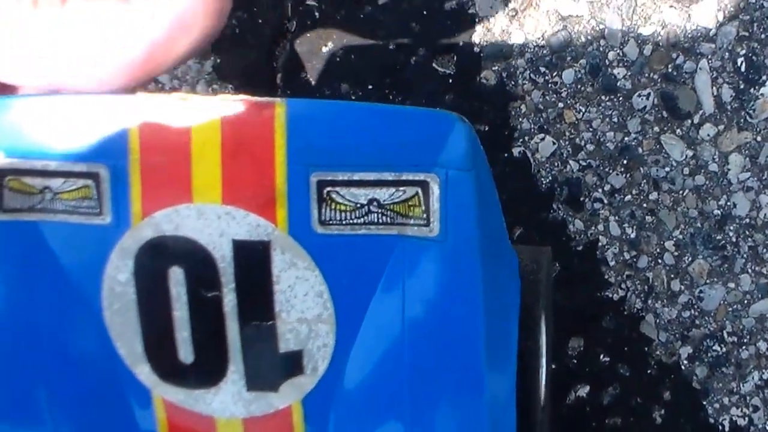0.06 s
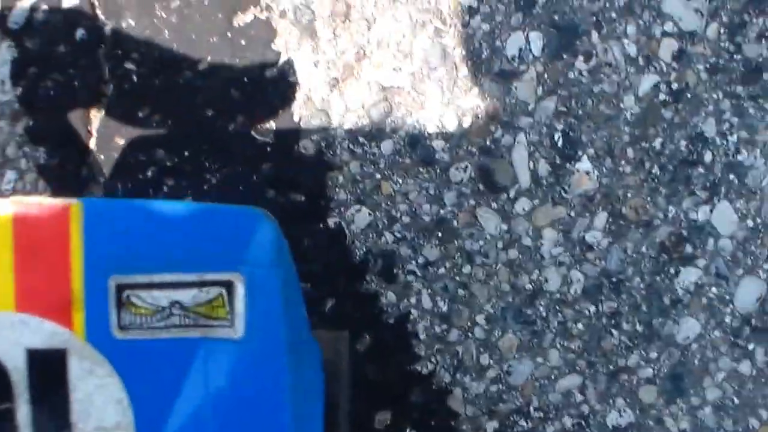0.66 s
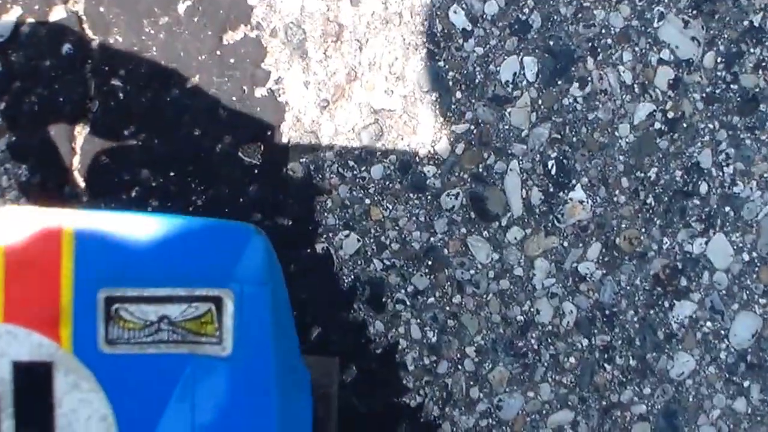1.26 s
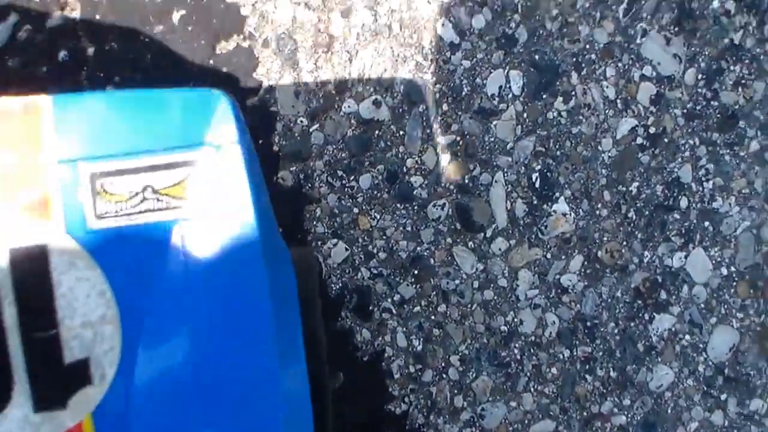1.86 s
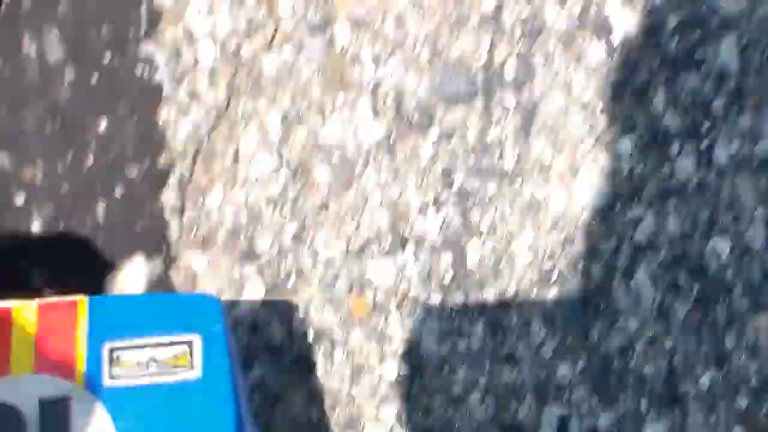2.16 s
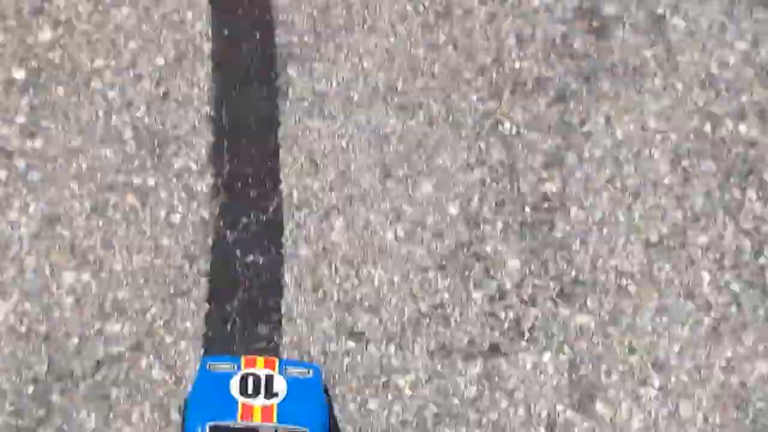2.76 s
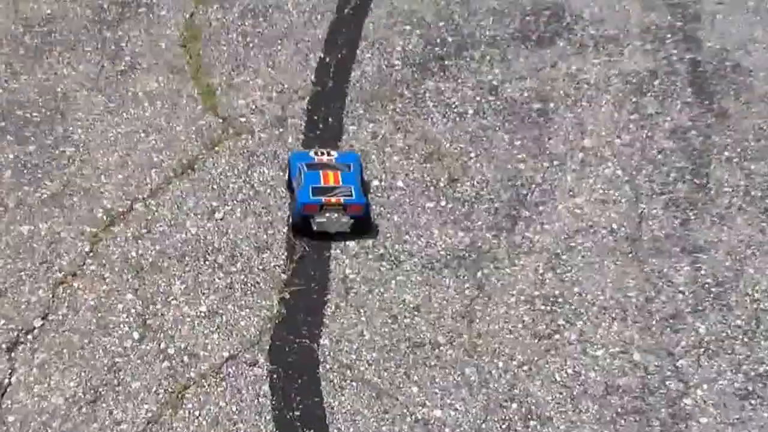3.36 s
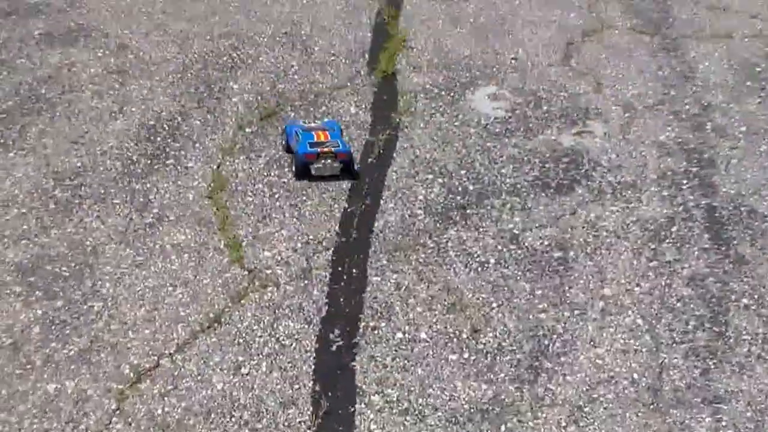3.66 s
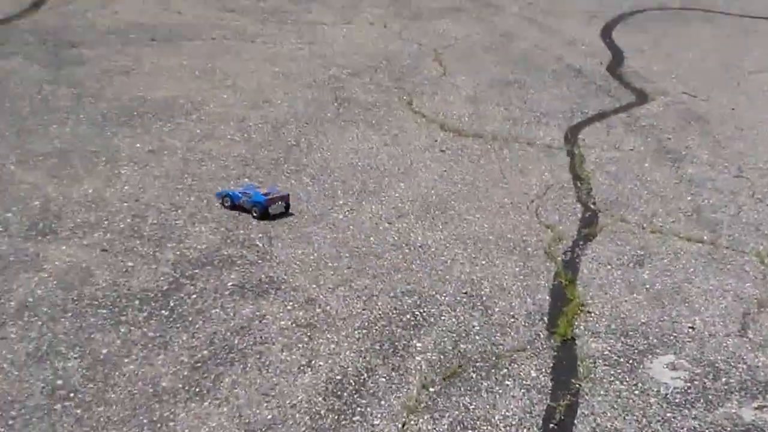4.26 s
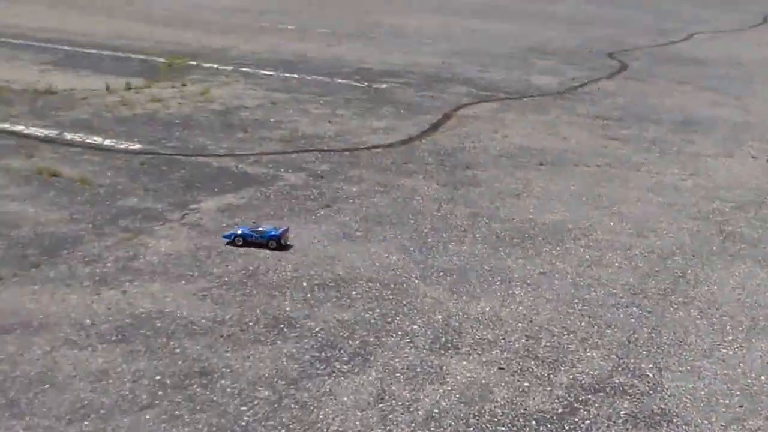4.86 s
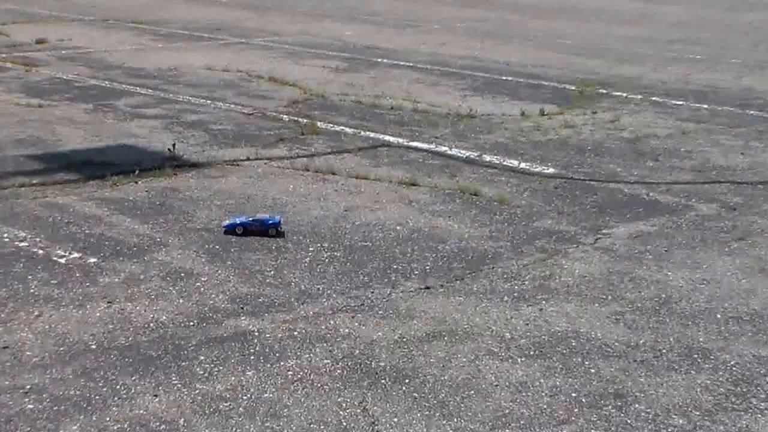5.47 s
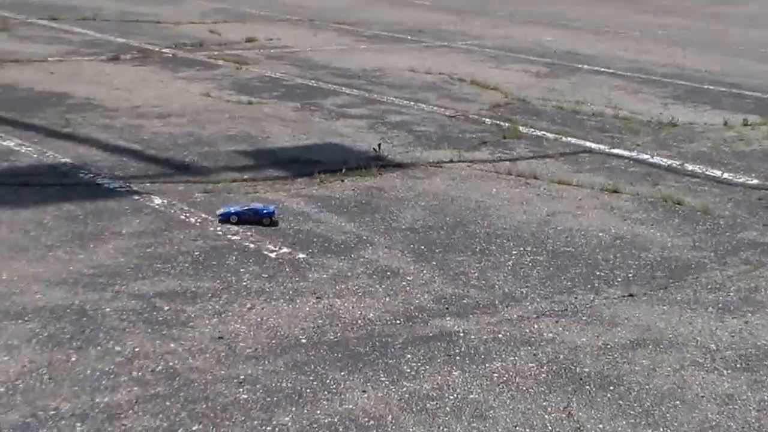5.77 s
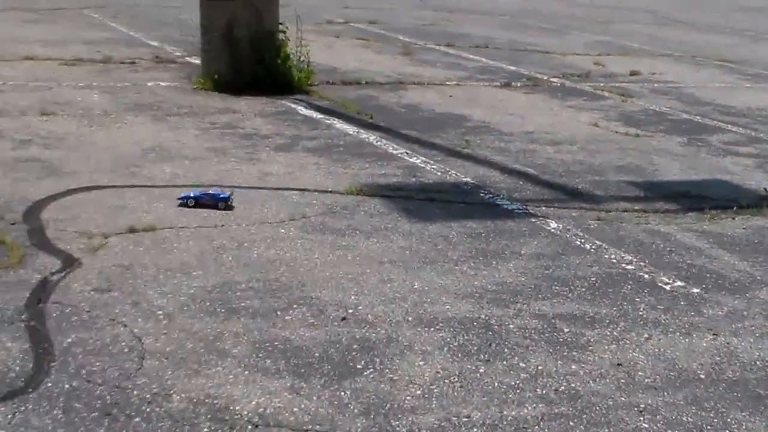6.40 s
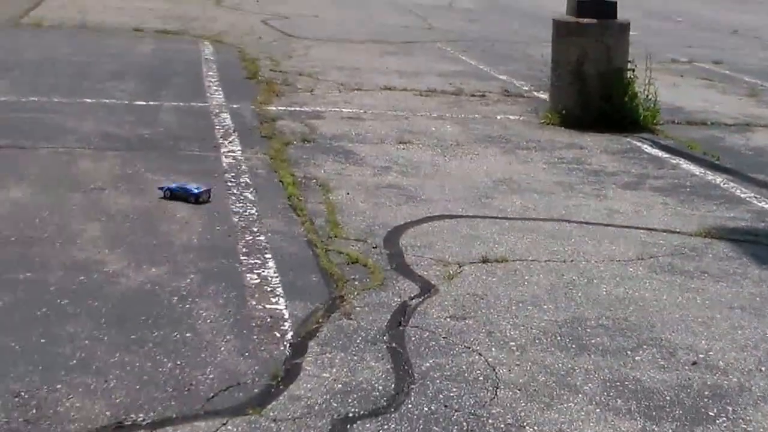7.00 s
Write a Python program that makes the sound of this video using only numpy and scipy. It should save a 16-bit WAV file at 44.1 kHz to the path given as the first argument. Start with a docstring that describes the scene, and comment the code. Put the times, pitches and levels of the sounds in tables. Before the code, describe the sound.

After a few plastic clicks, a toy car drives off across gritty asphalt, its shell clattering and motor whining, with gusts rumbling on the microphone.

```python
"""Gusty wind rumbles and slaps at the two ports of a hand-held camera, over the hiss of an empty lot.
A small electric toy car clicks and squeaks in the hand, is set down on coarse asphalt and drives away.
Gears and grit excite the resonances of its plastic shell, and bumps set it hopping in steady runs.
Through the rattle whine the motor and its gearing, their pitch pulled down by the load of each landing."""
import sys
import numpy as np
from scipy import signal
from scipy.fft import rfft, irfft, next_fast_len
from scipy.io import wavfile
from scipy.ndimage import uniform_filter1d, minimum_filter1d, map_coordinates

SR = 44100
rng = np.random.default_rng(int(sys.argv[2]) if len(sys.argv) > 2 else 0)


def wrap_up_sound(samples):
    """Save the sound to the file named by the first command line argument, as 16-bit audio."""
    columns = np.atleast_2d(samples).T
    # keep every value between -1 and 1, then stretch to whole-number steps
    tamed = np.clip(columns, -1, 1)
    steps = np.round(tamed * 32767).astype(np.int16)
    wavfile.write(sys.argv[1], SR, steps)


N = 319284

GEAR_SAG = 0.019  # share by which the load swings the pitch of the gears and partials
# resonances of the plastic when knocked or rubbed: (frequency [Hz], width [Hz], gain [dB])
PLASTIC = [(895, 660, 7.5), (1870, 270, 9), (2270, 1000, 6), (3540, 1900, 4), (4670, 820, -3),
           (5960, 4400, -9.5)]


def amp(db):
    """Decibels to amplitude ratio."""
    return 10 ** (np.asarray(db) / 20)


def unit(x):
    """Scale to rms 1."""
    return x / np.sqrt(np.mean(x ** 2) + 1e-20)


def along(points, hz):
    """Interpolate (frequency [Hz], value) points on a logarithmic axis."""
    f, v = np.transpose(points)
    return np.interp(np.log(hz + 1), np.log(f + 1), v)


def curves(rows):
    """Interpolate each column after the time to one value per sample."""
    s, *cols = np.transpose(rows)
    return [np.interp(np.arange(N) / SR, s, c) for c in cols]


def wobble(rate):
    """Slow random modulation: a spline through rate knots a second."""
    return map_coordinates(rng.standard_normal(int(N * rate / SR) + 4), [np.arange(N) * rate / SR])


def swells(rows, order=2):
    """Power sum of swells (time [s], level [dB], half length [s]); order 4 flattens their tops."""
    t, power = np.arange(N) / SR, np.zeros(N)
    for s, db, half in rows:
        near = slice(*np.searchsorted(t, [s - .1, s + .1]))
        power[near] += amp(db) ** 2 * np.exp(-abs((t[near] - s) / half) ** order)
    return power


def dips(rows, half_s, recover_s):
    """Summed decibels of dips (time [s], depth [dB]): Gaussian onset, exponential recovery."""
    rows = np.array(rows)
    since = np.arange(N) / SR - rows[:, :1]
    return rows[:, 1] @ np.exp(-(np.minimum(since, 0) / half_s) ** 2 - np.maximum(since, 0) / recover_s)


def filtered(x, gain, causal=False):
    """Linear filter of magnitude gain(hz); causal makes it minimum phase, ringing only after a blow."""
    size = 2 * next_fast_len(N // 2 + 4096)
    response = gain(np.fft.rfftfreq(size, 1 / SR))
    if causal:
        cepstrum = irfft(np.log(response + 1e-6))[:size // 2]
        cepstrum[0] /= 2
        response = np.exp(rfft(2 * cepstrum, size))
    return irfft(rfft(x, size) * response, size)[..., :N]


def coloured(x, colour, causal=False):
    """Shape the spectrum of x by (frequency [Hz], gain [dB]) points."""
    return filtered(x, lambda hz: amp(along(colour, hz)), causal)


def ring(x, modes):
    """Forced response of a body whose modes (frequency [Hz], width [Hz], gain [dB]) add in power."""
    def gain(f):
        return np.sqrt(sum((amp(db) / (1 + ((f * f - hz * hz) / (f * width + 1)) ** 2)) ** 2
                           for hz, width, db in modes))
    return filtered(x, gain, causal=True)


def impacts(rate, spread_db):
    """Shot noise: two independent streams of rate tiny blows a second, rms 1."""
    struck = rng.random((2, N)) < rate / SR
    size_db = spread_db * np.minimum(rng.standard_normal((2, N)), 2)
    return unit(struck * np.sign(rng.standard_normal((2, N))) * amp(size_db))


def tone(hz, width_hz, rough):
    """A spectral line of rms 1, broadened by modulation; rough is the share of power that flutters."""
    rough = np.clip(rough, 0, 1)
    flutter = unit(wobble(2 * width_hz)) + 1j * unit(wobble(2 * width_hz))
    carrier = np.exp(2j * np.pi * np.cumsum(hz) / SR)
    return unit(np.real((np.sqrt(1 - rough) + np.sqrt(rough / 2) * flutter) * carrier))


def air():
    """Ambient noise: the broadband hiss of the open lot, largely coherent between the ports."""
    # strength of the hiss: (time [s], relative level [dB])
    levels = [(0.0, -45.5), (0.42, -43.5), (0.9, -45), (1.3, -47.5), (2.05, -48), (2.25, -41.5),
              (2.6, -45.5)]
    # brief dips after the hardest gusts: (time [s], depth [dB])
    lulls = [(0.025, 7), (0.12, 9), (0.565, 11), (0.83, 8), (1.02, 9), (1.32, 4), (1.91, 1.5), (2.07, 0)]
    # spectrum of the hiss: (frequency [Hz], gain [dB])
    colour = [(100, 15.5), (500, 1.5), (1000, 0.5), (2000, -6), (3500, -15.5), (6000, -23.5),
              (10000, -33.5), (14000, -35)]
    air_db, = curves(levels)
    noise = rng.standard_normal(N) + 0.24 * rng.standard_normal((2, N))
    return amp(air_db + 8 - dips(lulls, half_s=0.026, recover_s=0.077)) * unit(coloured(noise, colour))


def wind():
    """Turbulent pressure, weakly correlated between the ports: a low rumble and a brighter flutter."""
    # strength of the wind: (time [s], relative rumble level [dB], flutter level [dB])
    levels = [(0, -35, -39.5), (0.27, -31.5, -28.5), (0.45, -31, -45.5), (1.1, -37.5, -32),
              (1.45, -34.5, -31), (1.87, -35.5, -28), (2.02, -33.5, -30), (2.25, -35.5, -41),
              (2.65, -37.5, -59), (3.0, -57, -81), (3.7, -43, -56), (4.5, -31.5, -48.5), (4.95, -35, -44.5),
              (5.45, -30, -43.5), (6.38, -31, -38), (6.54, -29.5, -33), (6.75, -33, -49), (7.24, -36, -62)]
    # the strongest eddies swell and pass: (time [s], relative level [dB], half length [s])
    puffs = [(0.004, -18, 0.0074), (0.087, -24, 0.0082), (0.25, -30, 0.017), (0.308, -23, 0.0082),
             (0.554, -21, 0.022), (0.808, -26.5, 0.013), (0.96, -26.5, 0.051), (1.032, -26, 0.0035),
             (1.245, -25, 0.037), (1.303, -20, 0.0049), (1.371, -29.5, 0.012), (1.425, -23.5, 0.015),
             (1.522, -21.5, 0.0054), (1.736, -25, 0.014), (1.868, -23.5, 0.019), (2.139, -27, 0.028),
             (5.405, -27, 0.012), (5.469, -27.5, 0.018), (5.558, -28, 0.015), (5.705, -31, 0.011),
             (5.83, -31.5, .014), (5.93, -38, 0.011), (6.257, -30.5, .01), (6.477, -32.5, 0.023),
             (6.543, -24, 0.014), (6.63, -32.5, 0.023)]
    # which port is windward: (time [s], tilt to the left [dB])
    windward = [(0, -2), (.35, -0.5), (.7, 2), (1.3, 4.5), (1.9, 2), (2.4, 0), (7.2, 0.5)]
    # spectra of rumble and flutter: (frequency [Hz], gain [dB])
    rumble_colour = [(10, -3), (25, -2), (60, -1), (110, -0.5), (170, -5.5), (250, -10), (400, -42),
                     (900, -56)]
    flutter_colour = [(60, -5.5), (130, -12), (200, 0), (300, 1.5), (450, -7.5), (700, -16), (1200, -26.5),
                      (2000, -42), (5000, -52), (12000, -65)]

    def eddies(colour):
        turbulence = rng.standard_normal((2, N)) + 0.39 * rng.standard_normal(N)
        return unit(coloured(turbulence, colour))

    rumble_db, flutter_db = curves(levels)
    left_db, = curves(windward)
    lumps = unit(amp(3.65 * np.array([wobble(70), wobble(70)])))
    gust = wobble(rate=16)
    rumble = amp(rumble_db + 3 + 2 * gust) * eddies(rumble_colour)
    flutter_power = amp(flutter_db + 2.5 * gust) ** 2 + amp(0.5) ** 2 * swells(puffs)
    flutter = np.sqrt(flutter_power) * lumps * eddies(flutter_colour)
    ports = amp([left_db, -left_db])
    return (rumble + flutter) * ports / np.sqrt(np.mean(ports ** 2, axis=0))


def slaps():
    """Pressure transients: the front of a sharp eddy hits the ports at once and decays exponentially."""
    # eddy fronts: (time [s], relative peak level [dB])
    fronts = [(0.079, -27.5), (0.183, -33), (0.589, -26), (0.795, -23.5), (0.856, -31.5), (1.15, -24.5),
              (1.202, -24.5), (1.498, -22), (1.557, -23.5), (1.695, -31), (1.752, -22), (1.925, -35),
              (1.986, -34), (6.535, -36)]
    # spectrum of a slap: (frequency [Hz], gain [dB])
    colour = [(150, 5.5), (350, -5), (600, -0.5), (1100, -4.5), (1700, -20), (3000, -30), (8000, -47)]
    rise_s, t60_s = 0.00077, 0.097
    t, push = np.arange(SR // 5) / SR, np.zeros(N)
    attack = 1 - np.exp(-(t / rise_s) ** 2)
    for s, db in fronts:
        push[round(s * SR):][:len(t)] += amp(db + 0.5 - 60 * t / t60_s) * attack
    return push * unit(coloured(rng.standard_normal((2, N)), colour)) * amp([[1.5], [-2.5]])


def squeaks():
    """Stick-slip friction of skin on plastic: a ragged scuff and a rough chirp that rises and falls."""
    # finger strokes: (time [s], relative level [dB], half length [s], top frequency [Hz])
    strokes = [(0.885, -57, 0.02, 3600), (1.525, -52, 0.02, 4320), (1.52, -59, 0.018, 5550),
               (1.615, -55, .02, 3300), (1.745, -52, .03, 3700), (1.825, -54, .025, 3500)]
    out = np.zeros(N)
    scuff = unit(ring(rng.standard_normal(N), PLASTIC))
    slips = unit(amp(3.4 * wobble(130)))
    for s, db, half, hz in strokes:
        stroke = np.sqrt(swells([(s, 0, half)]))
        chirp = tone(hz * (1 + 0.15 * (stroke - 1)), width_hz=430, rough=0.99)
        out += amp(db) * stroke * (chirp + amp(-1.5) * scuff)
    return out * slips


def clicks():
    """Impact excitation: each hit gives a knock, a bright crack and two damped modes of the part struck."""
    # the plastic clicks in the hand, and stones strike it: (time [s], relative level [dB],
    # crack gain [dB], first mode [Hz], second mode [Hz], second mode gain [dB])
    hits = [(0.9981, -47, -22, 1500, 3700, -20), (1.352, -27, -17, 1510, 3800, -26),
            (1.4384, -29.5, -28, 1500, 3280, -12), (1.6, -26.5, -25, 1800, 3050, -10),
            (1.6277, -35, -30, 2170, 3100, -10), (1.716, -24, -23, 1420, 3680, -19),
            (1.728, -30, -8, 3770, 4600, -3), (1.755, -20, -25, 850, 3650, -21),
            (1.8013, -30.5, -0.5, 2380, 3630, -1), (1.816, -33, -8, 2230, 3600, -6),
            (1.8424, -35, 3, 2170, 3450, -4), (1.8783, -38.5, -1, 1550, 5500, -16),
            (2.1083, -28, -26, 1660, 5540, -11.5), (2.146, -29, -26, 1560, 2250, -4),
            (2.169, -23.5, -8.5, 1800, 2200, -4), (2.186, -39, -20, 2220, 5900, -6),
            (2.2235, -26, -16, 1640, 3840, -25), (2.3131, -16, -32, 940, 1470, -6),
            (2.4176, -38, -16, 1800, 5340, -14), (2.4342, -16, -15, 1760, 5260, -12),
            (2.481, -21, -11, 2120, 7200, -19), (2.5457, -26, -10, 2050, 5160, -13),
            (2.677, -15, -10, 1680, 4000, -17), (2.6956, -17, -2, 1870, 4870, -17),
            (2.711, -28, -7, 1900, 4800, -12), (2.765, -20.5, -26, 2030, 920, 1),
            (3.032, -21, -18.5, 1850, 4030, -7), (3.0626, -28, -2, 1891, 4100, -10.5),
            (3.4712, -29.5, -3, 1970, 9980, -3), (3.543, -26, 2.5, 1950, 5390, -8),
            (3.6138, -31, 0, 1950, 3980, -7), (3.766, -29, -8, 1984, 9750, -3),
            (4.2691, -32, -34, 2060, 2950, -7), (4.3871, -24, -4, 1950, 4470, -6),
            (4.438, -27.5, 4.5, 1930, 5200, -16), (4.5146, -30, 2, 1920, 5200, -14),
            (5.2747, -15, -19, 2050, 4740, -19), (6.9731, -22, -21, 1975, 3700, -15.5),
            (7.0362, -26, 5.5, 1740, 6360, -11), (7.0665, -20.5, -23, 1990, 2550, -4),
            (7.1975, -26, 5, 1970, 4940, -4), (7.219, -14.5, -22, 1670, 2510, -11)]
    crack_colour = [(2000, 0.5), (6000, -1.5), (14000, -12.5)]  # (frequency [Hz], gain [dB])
    knocks, cracks, rings = np.zeros((3, 2, N))
    for s, db, crack_db, first_hz, second_hz, second_db in hits:
        at = round(s * SR)
        t = np.arange(min(SR // 10, N - at)) / SR
        here = slice(at, at + len(t))
        burst = rng.standard_normal(len(t)) + 0.52 * rng.standard_normal((2, len(t)))
        knocks[:, here] += amp(db - 12.5 - 60 * t / 0.041) * burst
        crack_decay = amp(-60 * t / 0.044) + amp(-60 * t / 0.0075)
        cracks[:, here] += amp(db + crack_db - 5.5) * crack_decay * burst
        rings[:, here] += amp(db - 4 - 60 * t / 0.023) * np.sin(2 * np.pi * first_hz * t)
        rings[:, here] += amp(db + second_db - 60 * t / 0.027) * np.sin(2 * np.pi * second_hz * t)
    return rings + ring(knocks, PLASTIC) + coloured(cracks, crack_colour, causal=True)


def landings():
    """Periodic bouncing after each bump: a row (time [s], strength [dB], half length [s]) per hop."""
    # runs of hops: (first landing [s], last landing [s], hops [count],
    # first strength [dB], last strength [dB], half length [s])
    runs = [(2.362, 2.525, 3, 1, 3.5, 0.027), (2.6, 2.672, 2, 8, 3, 0.019),
            (2.773, 2.843, 2, 6.5, 7.5, .012), (2.905, 3.022, 3, 3.5, 4, 0.019),
            (3.115, 3.315, 4, -5, -11, .024), (3.372, 3.442, 2, 7, 10, 0.018),
            (3.511, 3.645, 3, 6.5, 8, .018), (3.7, 4.082, 7, 6, 8, 0.026), (4.142, 4.41, 5, 6, 8, 0.023),
            (4.484, 4.79, 5, 3.5, -9, 0.016), (4.858, 5.062, 4, 2.5, 2, 0.018),
            (5.13, 5.275, 3, 1.5, 3, 0.022), (5.325, 5.381, 2, 7, 5, 0.019),
            (5.468, 5.943, 8, 4.5, 4, 0.02), (6.0, 6.146, 4, 2, -1.5, 0.018),
            (6.249, 6.445, 5, 0.5, -3, 0.012), (6.695, 6.985, 7, -5, 4, .013),
            (7.076, 7.149, 2, 5.5, -4, 0.013), (7.226, 7.226, 1, 8, 9, .012)]
    rows = np.vstack([np.linspace((first, first_db, half), (last, last_db, half), round(count))
                      for first, last, count, first_db, last_db, half in runs])
    rows[:, 1] += rng.standard_normal(len(rows))  # 1 dB of scatter: no two hops are equally hard
    return rows


def grip(times):
    """Traction loads the drive: from about -1 before each landing to about +1 after it."""
    t = np.arange(N) / SR
    nearest = times[np.searchsorted((times[1:] + times[:-1]) / 2, t)]
    return np.tanh((t - nearest) / .03) + 0.25 * wobble(25)


def gust_dip():
    """Attenuation in decibels: the car's rattle drops briefly as a gust hits, then recovers."""
    return dips([(6.5, 5.5)], half_s=0.026, recover_s=0.15)


def ticks():
    """Sparse impacts: loose grains flicked by the tyres excite the high modes of the shell."""
    # strength of the ticking: (time [s], level [dB])
    levels = [(2.3, -62), (2.8, -50), (3.3, -56), (4.5, -55), (5.6, -64), (7.24, -61)]
    # stiff parts of the shell: (frequency [Hz], width [Hz], gain [dB])
    modes = [(4120, 860, 5), (5200, 600, 0), (7100, 1500, 0), (9900, 1500, -10), (12200, 3200, -8)]
    tick_db, = curves(levels)
    t, t60_s = np.arange(SR // 25) / SR, 0.012
    burst = rng.standard_normal(len(t)) * amp(-60 * t / t60_s)
    mid, side = signal.fftconvolve(impacts(rate=30, spread_db=0), burst[None], axes=1)[:, :N]
    grains = ring(mid + 0.53 * np.array([side, -side]), modes)
    return unit(grains) * amp(tick_db - gust_dip())


def clatter(hop):
    """Free vibration: the loose shell knocks on the chassis, its modes mixed and detuned anew each time."""
    # knocking, hardest as the car pulls away: (time [s], relative level [dB])
    levels = [(2.3, -25.5), (2.6, -25.5), (2.74, -27), (3.0, -29), (3.3, -31), (3.5, -35.5), (4.3, -32.5),
              (5.5, -41), (7.24, -46)]
    # modes of the loose shell: (frequency [Hz], gain [dB], 60 dB decay time [s])
    modes = [(883, -6.5, 0.024), (1660, -5.5, 0.025), (2080, 0.5, 0.021), (3000, -7.5, 0.014),
             (3800, -19, .01)]
    knocks_per_s, spread_db, detune_share, crack_db = 68, 3, 0.067, -22
    clatter_db, = curves(levels)
    t, out = np.arange(SR // 25) / SR, np.zeros(N + SR)
    knock_count = np.cumsum(knocks_per_s * amp(2.5 * wobble(60))) / SR
    onsets = np.flatnonzero(np.diff(np.floor(knock_count)))
    hz, db, t60 = np.transpose(modes)[:, :, None]
    draws = rng.standard_normal((800, 2, len(hz), 1)).clip(-2, 2)
    lowpass = signal.butter(2, 6000, fs=SR)
    cracks = signal.lfilter(*lowpass, rng.standard_normal((len(draws), len(t))))
    cracks *= amp(crack_db - 60 * t / 0.011)
    for at, (size, detune), crack in zip(onsets, draws, cracks):
        decays = amp(db + spread_db * size - 60 * t / t60)
        rings = decays * np.sin(2 * np.pi * hz * (1 + detune_share * detune) * t)
        out[at:at + len(t)] += rings.sum(axis=0) + crack * amp(spread_db * size[0])
    return out[:N] * amp(clatter_db - gust_dip()) * unit(hop ** 0.57)


def partials(hop, drag):
    """Amplitude and frequency modulation: single partials of the drive swell and sag with the hops."""
    # partials that sing for a stretch: (start [s], end [s], first frequency [Hz], last frequency [Hz],
    # relative level [dB], width [Hz], roughness [0-1])
    stretches = [(2.304, 2.41, 937, 893, -33, 60, 0.7), (2.45, 2.6, 862, 872, -31.5, 44.9, 0.65),
                 (2.65, 2.75, 579, 590, -34, 35.36, .5), (2.819, 3.25, 591, 583.5, -41.5, 45, .85),
                 (2.902, 3.051, 1654, 1767, -35, 181, .9), (3.298, 4.0, 10230, 9700, -55, 343, 1),
                 (4.205, 4.308, 1980, 1935, -33, 90.1, 0.9), (4.28, 5.195, 2943, 2966, -42, 119.9, 0.9)]
    fade_s, waver_share = 0.022, 0.00798
    t, out = np.arange(N) / SR, np.zeros(N)
    for start, end, first_hz, last_hz, db, width_hz, rough in stretches:
        gate = (np.tanh((t - start) / fade_s) - np.tanh((t - end) / fade_s)) / 2
        glide_hz = np.interp(t, [start, end], [first_hz, last_hz])
        bend = 1 + waver_share * wobble(30) - GEAR_SAG * drag
        out += amp(db) * gate * tone(glide_hz * bend, width_hz, rough)
    return out * unit(hop ** 0.65)


def whine(hop, drag):
    """Speed falls with load: the motor races between hops and slows as the wheels grip, chirping down."""
    # singing of the motor: (time [s], relative level [dB], roughness [0-1])
    motor_levels = [(2.3, -40, .6), (2.6, -38, .75), (2.7, -40.5, 0.8), (2.95, -32.5, 0.8),
                    (3.3, -33.5, 0.4), (3.44, -36.5, .2), (3.51, -32, 0.06), (3.59, -34, 0.08),
                    (3.72, -46, 0.51), (4.28, -42.5, 0.5), (4.7, -42, 0.4), (5.4, -47, 0.55),
                    (5.8, -43, 0.5), (6.35, -39.5, 0.6), (6.55, -37, 0.7), (7.24, -52, 0.62)]
    # motor tone before the load bends it: (time [s], frequency [Hz])
    motor_pitch = [(2.3, 1782), (2.6, 2014), (2.899, 1745), (3.2, 1940), (3.52, 2052), (4.2, 1901),
                   (5.0, 2020), (7.2, 1990)]
    # singing of the gears: (time [s], relative level [dB])
    gear_levels = [(2.3, -59), (3.3, -40), (3.7, -59), (4.8, -55), (5.2, -54), (5.42, -38.5), (5.9, -38.5),
                   (6.1, -39), (6.44, -39), (6.5, -44), (7.24, -51)]
    # gear tones: (frequency [Hz], width [Hz], gain [dB])
    gear_tones = [(2390, 130, 3.5), (3670, 80, 9.5), (4780, 55, 2.5), (5230, 100, -16)]
    motor_sag = 0.07  # share by which a landing swings the pitch
    motor_db, motor_rough = curves(motor_levels)
    motor_hz, = curves(motor_pitch)
    gears_db, = curves(gear_levels)
    load = np.sqrt(np.maximum(hop ** 2 - .85, 0))  # the motor sings loudest under load near each landing, and more softly between them
    motor = tone(motor_hz * (1 - motor_sag * drag), width_hz=100, rough=motor_rough)
    gears = sum(amp(db) * tone(hz * (1 - GEAR_SAG * drag), width, rough=0.64)
                for hz, width, db in gear_tones)
    return amp(motor_db) * unit(load) * motor + amp(gears_db - 1.5) * unit(gears * hop ** 0.83)


def rattle(hop):
    """Random forcing: dense blows, harder at each hop, ring a shell whose sides radiate unlike spectra."""
    # rattle between hops, fading as the car drives off: (time [s], level [dB])
    levels = [(2.3, -30), (2.72, -31), (2.95, -29.5), (3.25, -26.5), (3.42, -33), (3.75, -31), (4.2, -33),
              (4.6, -33.5), (5.05, -31.5), (5.45, -37), (6.0, -36), (6.4, -35.5), (6.6, -35.5), (7.24, -35)]
    # grit spraying from the tyres: (time [s], treble lift [dB])
    spray = [(2.3, -5), (2.5, -13), (2.85, 1), (3.5, 1.5), (5.0, -0.5), (5.85, 2), (6.7, -0.5), (7.24, 3)]
    # side facing the camera: (time [s], side [0 roof, 1 close tail, 2 far tail, 3 and above flank])
    facing = [(2.3, 0), (2.58, 0.65), (2.76, 0.45), (3.35, 1.7), (4.1, 2), (4.45, 3.5)]
    # resonances heard from each side: (frequency [Hz], width [Hz], gain [dB])
    roof = [(630, 230, -2), (805, 52, -7), (910, 260, -1.5), (1360, 630, -5.5), (1740, 200, -3.5),
            (2020, 370, -13.5), (2880, 360, -14.5), (3540, 1300, -34), (5200, 420, -27), (6720, 6500, -27),
            (11640, 8070, -47.7)]
    tail_close = [(585, 36, -5.5), (608, 120, -8.5), (857, 230, -8.5), (1460, 250, -4.5), (1850, 360, -3.5),
                  (2150, 360, -8), (2930, 1200, -12.5), (3800, 1000, -16.5), (5300, 930, -25),
                  (7040, 2100, -27), (11880, 2400, -40)]
    tail_far = [(598, 140, -11), (843, 120, -13), (1440, 270, -9.5), (1950, 1540, -11.5), (1960, 440, -1.5),
                (2850, 250, -8), (3240, 810, -9.5), (4430, 470, -22), (5310, 670, -21), (6900, 1300, -26),
                (9760, 1700, -29.5), (12150, 9200, -35)]
    flank = [(577, 300, -8.5), (951, 160, -7), (1664, 690, -2.5), (2035, 230, 0.5), (2526, 400, -3),
             (3026, 440, -6), (3610, 510, -4), (4690, 1650, -13.5), (5320, 310, -16.5), (6650, 1330, -16),
             (9400, 2000, -24.5), (10100, 580, -20.5), (12090, 3300, -25.5)]
    (roll_db,), (spray_db,), (aspect,) = map(curves, (levels, spray, facing))
    chatter = unit(amp(2.1 * np.tanh(wobble(240))))  # the tyres catch and slip on single stones
    blows = unit(impacts(rate=3600, spread_db=1.0) + 0.5 * rng.standard_normal((2, N))) * chatter
    grit = filtered(blows, lambda hz: hz ** 4 / (hz ** 4 + 5000 ** 4))  # the part above 5 kHz
    clumps = unit(hop ** .55 * amp(1.1 * wobble(60) + .6 * wobble(18)))
    force = (blows - grit) * unit(hop ** 0.71) + grit * clumps * amp(spray_db)
    shell = np.zeros((2, N))
    for side, modes in enumerate((roof, tail_close, tail_far, flank)):
        share = np.clip(1 - abs(np.clip(aspect, 0, 3) - side), 0, 1)
        shell += share * unit(ring(force, modes))
    return shell * amp(roll_db - gust_dip()) * np.sqrt(np.mean(hop ** 2))


def car():
    """Common modulation: shell and drive start together and share the hops; only the treble is wide."""
    # stereo width of the rattle: (frequency [Hz], side gain [dB])
    width = [(500, -46), (1700, -35), (3200, -21.5), (4500, -11.5), (6000, -5.5), (7000, -6.5),
             (9200, -1.5), (10700, -16), (14000, -44)]
    # unequal treble response of the ports: (frequency [Hz], left minus right [dB])
    ports = [(3000, -0.5), (3900, -2.5), (5200, -0.5), (5850, -8), (6500, 1.5), (7200, 1), (7900, -7),
             (8450, 0), (9450, 6), (10700, 1), (14000, -0.5)]
    start_s = 2.3
    running = (1 + np.tanh((np.arange(N) / SR - start_s) / .024)) / 2
    hops = landings()
    hop = np.sqrt(1 + swells(hops, order=4))  # amplitude factor, 1 between landings
    mid, side = rattle(hop)
    drag = grip(np.sort(hops[:, 0]))
    mid = mid + whine(hop, drag) + partials(hop, drag) + clatter(hop)
    side = coloured(side, width)
    stereo = running * (np.array([mid + side, mid - side]) + ticks())
    return filtered(stereo, lambda hz: amp(np.outer([.5, -.5], along(ports, hz))))


def scene():
    """Superposition in a free field: car, handling and weather add, with no walls to reflect them."""
    return car() + clicks() + squeaks() + wind() + slaps() + air()


def record(dry):
    """Peak and band limiting: the camera holds the peaks down and passes nothing above its top frequency."""
    ceiling, window, top_hz = .28, SR // 250, 14350
    needed = np.minimum(1, ceiling / (abs(dry).max(axis=0) + 1e-9))
    gain = uniform_filter1d(minimum_filter1d(needed, window), window)
    return filtered(dry * gain, lambda hz: hz < top_hz)


dry = scene()
out = record(dry)
wrap_up_sound(out)
```